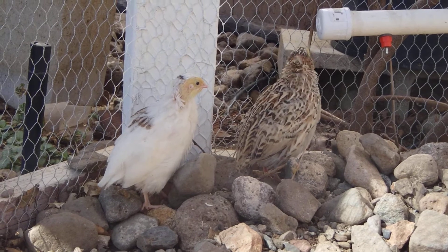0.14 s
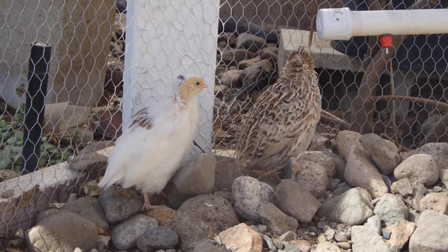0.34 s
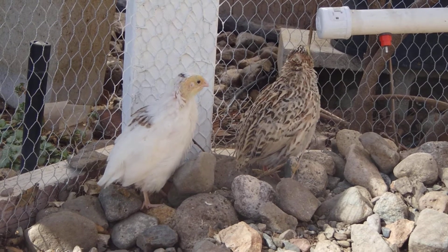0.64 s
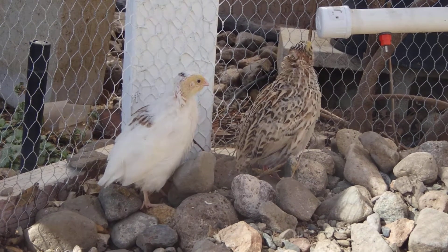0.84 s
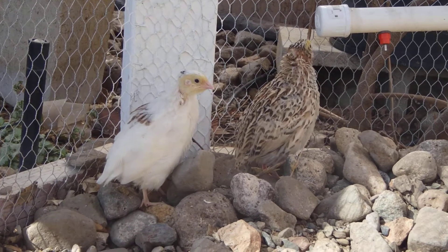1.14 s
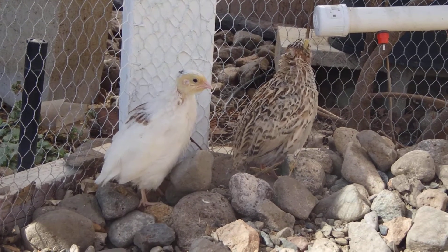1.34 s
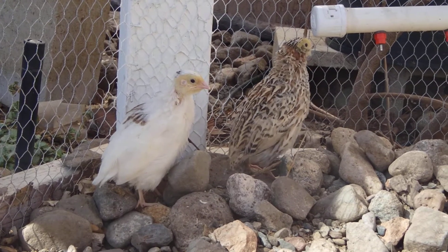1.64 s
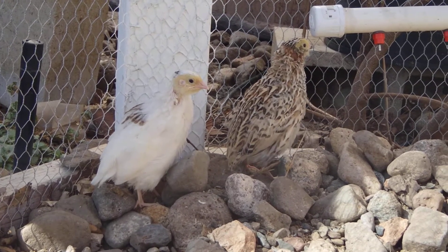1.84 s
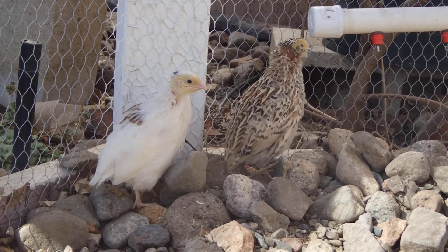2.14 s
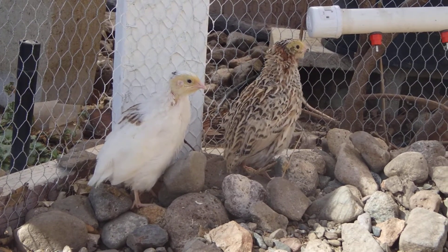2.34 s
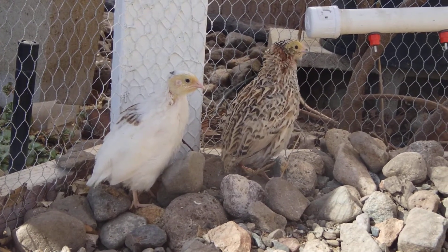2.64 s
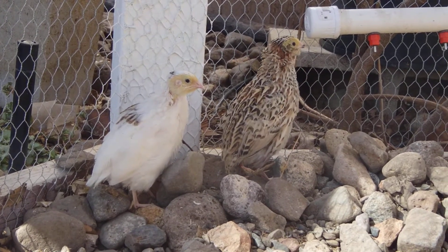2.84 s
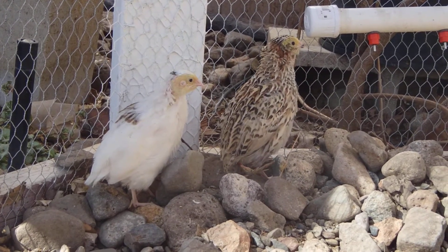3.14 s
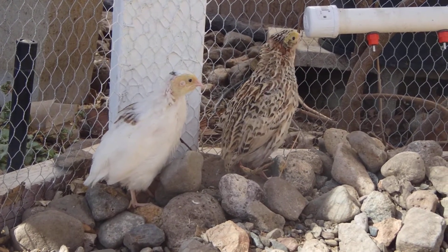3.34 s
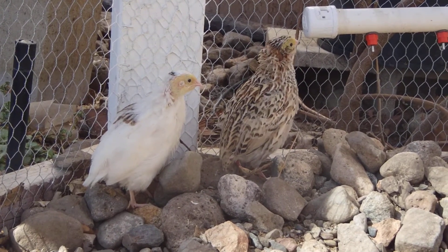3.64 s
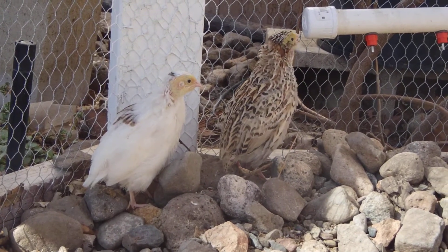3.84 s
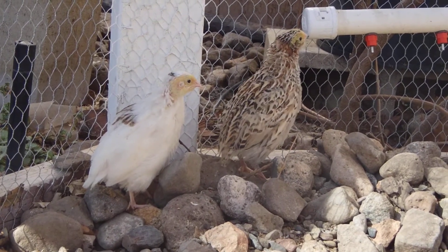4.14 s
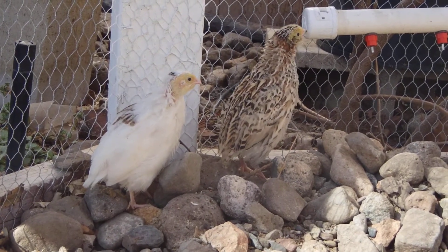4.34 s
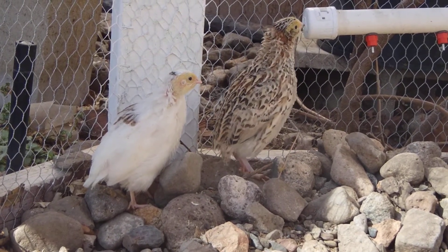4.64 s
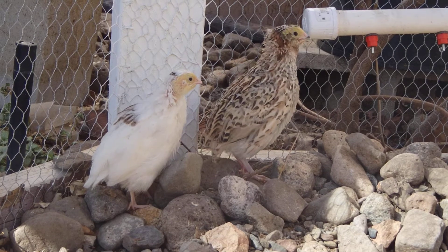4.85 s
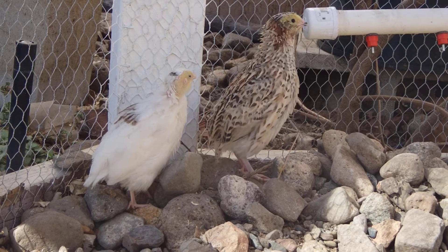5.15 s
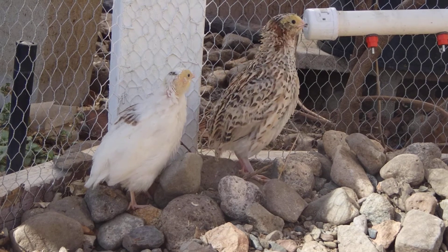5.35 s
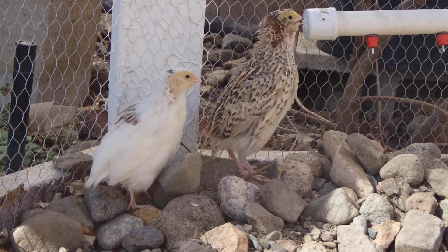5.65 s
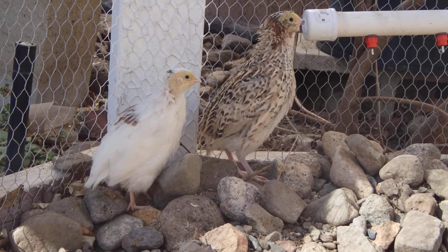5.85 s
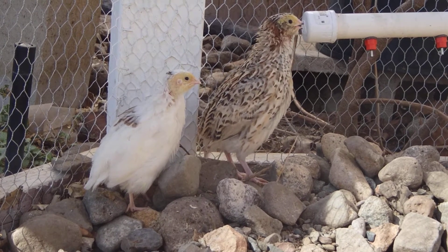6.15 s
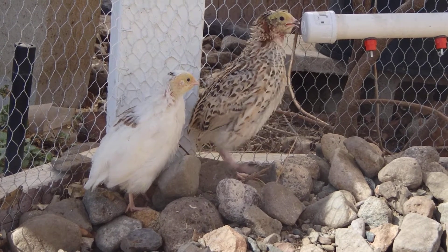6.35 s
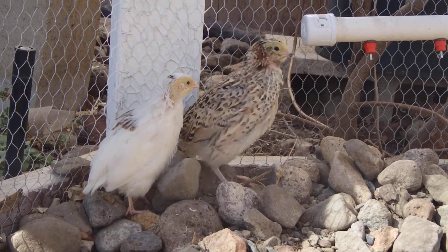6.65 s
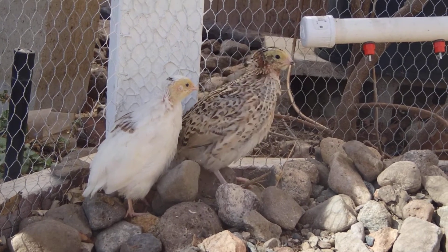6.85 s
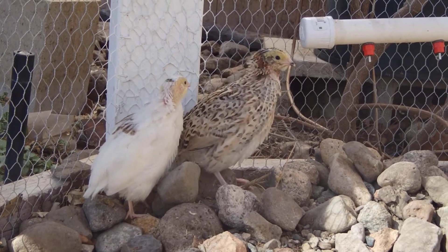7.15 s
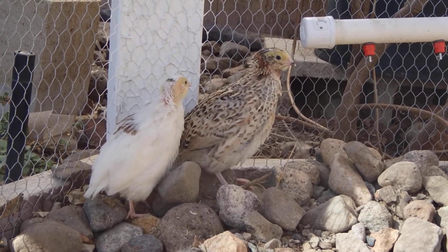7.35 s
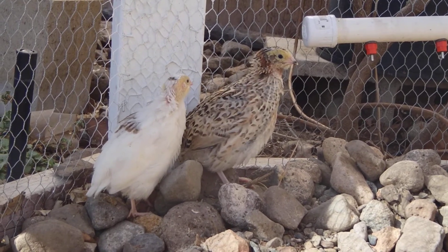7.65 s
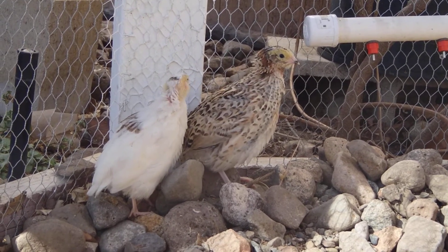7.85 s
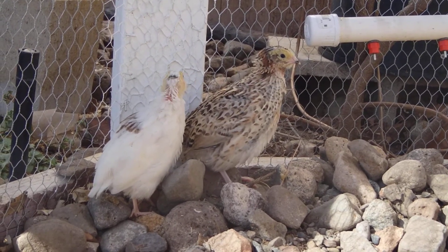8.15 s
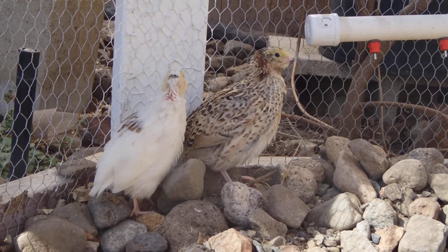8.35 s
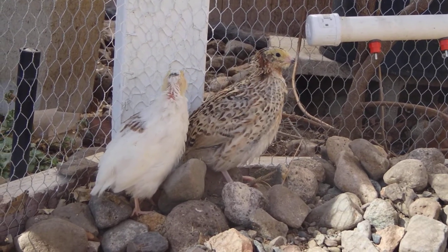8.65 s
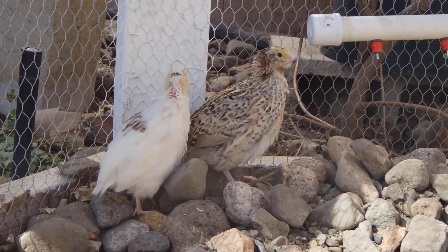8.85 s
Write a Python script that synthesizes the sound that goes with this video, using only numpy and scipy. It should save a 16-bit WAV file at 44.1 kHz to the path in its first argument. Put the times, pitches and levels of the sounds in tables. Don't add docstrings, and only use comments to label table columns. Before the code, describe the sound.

A quail stands close to the microphone in a stony outdoor pen. Grit snaps underfoot early, with one soft low knock on the camera. Soft, broken piping then grows into regular loud whistles, each dropping in, warbling, holding, breaking and sliding down. The strongest crackle with overload. After the last call, only faint far birds, town rumble and hiss remain.

```python
import sys
import numpy as np
from scipy import signal
from scipy.io import wavfile
from scipy.ndimage import uniform_filter1d

SR = 44100
rng = np.random.default_rng(int(sys.argv[2]) if len(sys.argv) > 2 else 0)


def elevation(decibels):
    levels = np.asarray(decibels, float)
    return 10 ** (levels / 20)


def int16_out(signal):
    q = np.round(np.clip(np.atleast_2d(signal).T, -1, 1) * 32767)
    wavfile.write(sys.argv[1], SR, q.astype(np.int16))


N = 396459


def evened(x):
    return x / np.sqrt(np.mean(x ** 2) + 1e-20)


def read(points, hz):
    f, value = np.transpose(points)
    return np.interp(np.log(hz + 1), np.log(f + 1), value)


def add(mix, s, sound):
    part = mix[round(s * SR):][:len(sound)]
    part += sound[:len(part)]


def resonate(x, hz, width):
    turn = np.exp(2j * np.pi * np.cumsum(hz * np.ones(len(x))) / SR)
    r = np.exp(-np.pi * width / SR)
    return 2 * (turn * signal.lfilter([1 - r], [1, -r], x / turn + 1e-18)).real


def resonate_twice(x, hz, width):
    return resonate(resonate(x, hz, width), hz, width)


def smooth_twice(x, first, second):
    return uniform_filter1d(uniform_filter1d(x, size=first), size=second)


def hump(u):
    return np.cos(np.pi * np.clip(u, -.5, .5)) ** 2


def tail(t60, seconds):
    taps = np.zeros((2, round(seconds * SR)))
    start = np.arange(400, taps.shape[1] - 20, 20)
    at = start + rng.integers(0, 20, (2, len(start)))
    sizes = rng.choice([-1., 1.], at.shape) * elevation(-60 * at / SR / t60)
    np.put_along_axis(taps, at, sizes, 1)
    return taps / np.linalg.norm(taps[0])


# time in seconds, pitch lift in Hz, width in seconds, catch in dB.
WARBLE_CRESTS = [(1.561, 120, .017, 0), (2.317, 168, .024, 0), (2.339, 130, .018, 0),
                 (2.857, 327, .022, -10), (3.384, 300, .017, 0), (3.406, 218, .02, -5),
                 (3.943, 251, .019, -12), (3.963, 289, .021, -12), (3.982, 240, .027, -8),
                 (4.494, 245, .021, -7.5), (4.515, 317, .022, -7.5), (4.533, 345, .022, -18),
                 (4.5495, 180, .028, -13), (5.0642, 331, .023, -20), (5.0845, 324, .021, -22),
                 (5.1028, 304, .02, -24), (5.1145, 270, .024, -1.5), (5.686, 250, .018, -8),
                 (5.7042, 255, .021, -13), (5.722, 110, .018, -6), (5.824, 75, .024, 0),
                 (6.364, 240, .018, -7), (6.382, 218, .02, -3)]
# time in seconds, level in dB.
VOICE_CATCHES = [(.929, -17), (.944, -25), (2.308, -11), (2.328, -14), (2.868, -12), (2.998, -28),
                 (3.416, -8.5), (3.5265, -18), (3.9542, -6), (4.0044, -13), (4.0164, -10), (4.072, -30),
                 (4.099, -10), (4.5218, -11), (4.5262, -8), (3.9893, -12), (5.7268, -12), (5.7, -7),
                 (4.566, -9), (4.582, -10), (4.6, -7), (4.505, -9), (.971, -22), (3.553, -10), (4.6595, -8),
                 (5.1268, -8), (5.071, -4), (5.1903, -10), (5.232, -9), (5.811, -12), (6.3743, -8)]
# time in seconds, change of effort
# in dB, crack in dB, gain drop in dB.
EFFORT_SURGES = [(4.5243, 6.5, -25, 1), (4.541, 2.5, -24, 2), (4.5465, 4, -22, 5), (5.0798, 2, -25, 1),
                 (5.0938, 2, -28, 1), (5.0985, 2.5, -24, 2), (5.1225, 3.5, -25, 4.5), (5.7015, 3, -27, 1),
                 (5.714, -3, -31, 1), (5.7285, 0, -26, 2), (5.7545, 1.5, -26, 3), (5.76, 0, -30, 3),
                 (6.381, -1.5, -38, 0), (6.385, 3, -25, 1.5)]
# partial number, level under the second in dB, throat cut in Hz,
# extra growth in dB per dB of effort.
UPPER_PARTIALS = [(3, -33, 4310, .2), (4, -33.5, 5080, 1.1), (5, -57, 6700, .8), (6, -59, 7900, .8)]


def whistle(corners):
    s, pitch, second_db, first_db = np.transpose(corners)
    t = np.arange(s[0], s[-1], 1 / SR)
    loudest_db = second_db.max()
    curves = (pitch, elevation(second_db), elevation(first_db))
    hz, second, first = (uniform_filter1d(np.interp(t, s, c), size=90) for c in curves)

    plunge = np.interp(t, s[1] + np.array([.003, .0095]), [pitch[1], pitch.min()])
    hz = np.maximum(hz, plunge * (t > s[1]))
    second = second * np.clip((t - s[1] - .006) / .0045, 0, 1)

    warble = sum(lift * hump((t - at) / width) for at, lift, width, _ in WARBLE_CRESTS)
    catches = VOICE_CATCHES + [(at + .0003, db) for at, _, _, db in WARBLE_CRESTS]
    throb_db = sum(db * hump((t - at) / (.002 + .0004 * abs(db))) for at, db in catches)
    throb_db += sum(db * hump((t - at) / .0068) for at, db, _, _ in EFFORT_SURGES)
    tremor, flutter, beads = smooth_twice(rng.standard_normal((3, len(t))), 150, 120)
    throb_db -= .9 * min(loudest_db + 28, 0) * np.minimum(evened(beads), .3)

    hz = (hz + warble) * (1 + .035 * tremor)
    phase = 2 * np.pi * np.cumsum(hz) / SR
    throat_top_hz = 3270
    second = second * elevation(throb_db) / (1 + (2 * hz / throat_top_hz) ** 60)
    first = first * elevation(1.77 * evened(flutter) + 3.2 * (warble / 300) ** 2)
    voice = first * np.sin(phase) + second * np.sin(2 * phase)

    ahead = uniform_filter1d(warble[::-1], size=1300, origin=649)[::-1]
    steadiness = 1 / (1 + (ahead / 35) ** 4)
    for k, db, top_hz, growth in UPPER_PARTIALS:
        level = second * steadiness * elevation(db + growth * (loudest_db + 7.5))
        voice += level / (1 + (k * hz / top_hz) ** 24) * np.sin(k * phase)

    breath = resonate_twice(rng.standard_normal(len(t)), 2950, 500)
    windpipe = resonate_twice(rng.standard_normal(len(t)), 1700, 110)
    voice += elevation(-14) * first * evened(windpipe) * (1 - steadiness)
    return s[0], np.sqrt(2) * voice + elevation(-29.5) * second * evened(breath)


def contour(entry, hold, slide):
    s, entry_hz, entry_db, land_hz, ring_db = entry
    full, hz, db, fade_db = hold
    gap, end, from_hz, to_hz, slide_db = slide
    silent_db, break_db, thin_db = -64, -24, -7
    sagged = (hz + from_hz) / 2
    faded = max(gap - .013, full + .004)
    low_db, slide_low_db = (max(-22.5 + .74 * d, -46) for d in (db, slide_db))
    fill_db = max(-1.5 + .6 * min(db + 5, 0), -13)
    return [(s - .0065, entry_hz - 60, silent_db, silent_db),
            (s, entry_hz, silent_db, entry_db),
            (s + .0105, land_hz, ring_db, low_db - 5.5),
            (s + .038, hz + .2 * (land_hz - hz), db + fill_db, low_db - 1.5),
            (full, hz, db, low_db),
            ((full + faded) / 2, (hz + sagged) / 2, db + .7 * fade_db, low_db + 1.1),
            (faded, sagged, db + fade_db, low_db + .6),
            (gap, sagged + 20, slide_db + break_db, slide_low_db + .45 * break_db),
            (gap + .015, from_hz, slide_db, slide_low_db),
            (end, to_hz, slide_db - 2.5, slide_low_db + thin_db),
            (end + .008, to_hz - 15, slide_db - 27, slide_low_db + 1.4 * thin_db),
            (end + .03, to_hz - 30, silent_db, silent_db)]


# start in seconds, entry pitch in Hz, entry level in dB,
# landing pitch in Hz, level in dB as the throat first rings.
CALL_ENTRIES = [
    (.909, 1810, -43, 1450, -32.5),
    (1.52, 1775, -38.5, 1515, -31.5),
    (2.278, 1785, -34, 1490, -31.5),
    (2.836, 1940, -38, 1430, -32),
    (3.366, 2005, -32, 1355, -36),
    (3.924, 2025, -30, 1310, -24.5),
    (4.474, 2065, -30, 1265, -16.5),
    (5.043, 2195, -33.5, 1305, -9.5),
    (5.663, 2015, -29, 1285, -11),
    (6.341, 1950, -28.5, 1290, -13),
]
# fullest moment in seconds, pitch in Hz, effort in dB,
# fade before the break in dB.
CALL_HOLDS = [(.988, 1380, -37, -8), (1.58, 1235, -53, 0), (2.33, 1255, -38.5, -18), (2.915, 1195, -29, -7),
              (3.468, 1240, -14.5, -9), (3.99, 1300, -10, -11), (4.545, 1290, -6.5, -6.5),
              (5.165, 1300, -4.3, -9), (5.76, 1280, -2.5, -11), (6.39, 1290, -6, -9)]
# break in seconds, end in seconds, start pitch in Hz,
# end pitch in Hz, effort in dB.
CALL_SLIDES = [(1.01, 1.04, 1370, 1320, -47), (1.63, 1.655, 1340, 1345, -42),
               (2.395, 2.415, 1225, 1215, -43), (2.968, 3.015, 1175, 1150, -34),
               (3.508, 3.555, 1225, 1150, -19.5), (4.058, 4.12, 1270, 1175, -13),
               (4.633, 4.683, 1235, 1165, -10.5), (5.205, 5.257, 1235, 1155, -8.5),
               (5.82, 5.872, 1240, 1150, -6.5), (6.495, 6.549, 1215, 1110, -11)]


def quail_calls(quail):
    for call in zip(CALL_ENTRIES, CALL_HOLDS, CALL_SLIDES):
        add(quail, *whistle(contour(*call)))


# centre in Hz, width in Hz, level in dB.
HOARSE_THROAT = [(1120, 450, -15), (1760, 320, -8), (2280, 170, -7), (2860, 410, -3.5), (4430, 600, -22)]


def rasp(s, length, rate, db, rough):
    t = np.arange(round(length * SR)) / SR
    turns = np.cumsum(rate * (1 - .023 * t / length)) / SR
    pulses = sum(np.cos(2 * np.pi * k * turns) for k in range(1, 16))
    puffs = np.exp(-(turns % 1) / .3) * rng.standard_normal(len(t))
    drive = (1 - rough) * evened(pulses) + rough * evened(puffs)
    throat = sum(elevation(d) * resonate_twice(drive, f, w) for f, w, d in HOARSE_THROAT)
    fade = signal.windows.tukey(len(t), .5) * np.exp(-.8 * t / length)
    return s, elevation(db) * evened(throat) * fade


# start in seconds, length in seconds, pulses per second,
# level in dB, roughness from 0 to 1.
HOARSE_NOTES = [
    (.99, .12, 330, -41.5, .9),
    (1.63, .065, 234, -41.5, .3),
    (2.4, .055, 290, -40, .4),
    (2.995, .03, 300, -49, .8),
    (6.137, .048, 394, -39.5, .6),
]


def quail_rasps(quail):
    for row in HOARSE_NOTES:
        add(quail, *rasp(*row))


# delay in seconds, left level in dB, right level in dB.
PEN_ECHOES = [(.0031, -16.5, -15.5), (.0068, -15, -13), (0.0135, -18.5, -15.5), (.022, -26, -26),
              (.072, -33.5, -31.5), (.118, -38.5, -36)]


def pen(x):
    low = resonate_twice(x, 1500, 1200)
    left = elevation(-.2) * x + .058 * low
    right = elevation(.53) * np.roll(x - .099 * low, 1)
    out = np.array([left, right])
    for delay, left_db, right_db in PEN_ECHOES:
        out += np.roll(x, round(delay * SR)) * elevation(np.array([[left_db], [right_db]]))
    near = signal.fftconvolve(x[None], tail(.033, .27), axes=1)[:, :N]
    yard = signal.fftconvolve(x[None], tail(.52, .41), axes=1)[:, :N]
    return out + elevation(-22) * (near[0] + .5 * near) + elevation(-28.5) * (yard[0] + .6 * yard)


# time in seconds, peak in dB.
GRIT_SNAPS = [(.6114, -37.5), (.6215, -30), (.634, -28), (.6432, -19.5), (.6505, -25), (.6538, -18),
              (.6573, -17), (.6602, -15.5), (.6737, -15.5), (.836, -33), (.8474, -38)]
# time in seconds, peak in dB, pitch in Hz.
CAMERA_KNOCK = (.744, -25.5, 88)


def gravel():
    grit = np.zeros(N)
    t = np.arange(200) / SR
    for s, db in GRIT_SNAPS:
        snap = rng.standard_normal(len(t)) * np.exp(-t / .001)
        snap = signal.lfilter(*signal.butter(5, 8000 / (SR / 2)), resonate(snap, 4500, 3500))
        add(grit, s, elevation(db) * snap / abs(snap).max())
    s, db, hz = CAMERA_KNOCK
    t = np.arange(1500) / SR
    turns = hz * t + .67 * (1 - np.exp(-t / .0033))
    knock = np.zeros(N)
    add(knock, s, -elevation(db) * np.sin(2 * np.pi * turns) * np.exp(-t / .011))
    return grit * elevation(np.array([[-3], [.6]])) + knock


# start in seconds, length in seconds, start pitch in Hz,
# end pitch in Hz, level in dB.
CLEAR_WHISTLES = [
    (.345, .15, 1440, 1345, -52),
    (.589, .166, 2225, 2055, -56),
    (6.188, .11, 4560, 4490, -63.5),
    (6.8, .05, 2060, 2100, -56),
    (7.121, .092, 1450, 1400, -59),
    (7.6, .11, 1920, 2350, -55),
    (7.808, .057, 2050, 2000, -58),
    (8.52, .04, 1980, 2250, -56),
]
# start in seconds, length in seconds, start pitch in Hz,
# end pitch in Hz, level in dB.
SCRATCHY_CHIRPS = [(.554, .06, 3180, 3000, -49.5), (1.107, .048, 4050, 4060, -57),
                   (1.822, .052, 2650, 3450, -42), (1.831, .03, 3800, 3950, -52),
                   (2.013, .04, 2960, 2300, -50.5), (2.195, .017, 3280, 3060, -49),
                   (3.355, .035, 4280, 4570, -53), (4.259, .065, 2450, 3550, -41),
                   (8.935, .025, 2050, 2000, -56), (7.925, .055, 2250, 3000, -47),
                   (4.33, .071, 3300, 3100, -52.5), (4.98, .03, 3060, 3100, -48),
                   (5.52, .079, 3000, 2880, -47.5), (6.93, .08, 3000, 3150, -40.5),
                   (7.02, .05, 3000, 3000, -45), (7.197, .035, 3180, 3000, -47.5),
                   (7.602, .14, 2950, 3000, -54), (7.626, .09, 4100, 4560, -60.5),
                   (7.901, .04, 3740, 4300, -55.5), (8.8, .13, 3000, 3250, -53)]


def far_birds():
    direct = np.zeros(N)
    for rows, blur_hz in ((CLEAR_WHISTLES, 40), (SCRATCHY_CHIRPS, 420)):
        for s, length, start_hz, end_hz, db in rows:
            glide = np.linspace(start_hz, end_hz, round(length * SR))
            fuzz = resonate_twice(rng.standard_normal(len(glide)), glide, blur_hz)
            add(direct, s, elevation(db) * evened(fuzz) * signal.windows.tukey(len(glide), .5))
    swell = evened(smooth_twice(rng.standard_normal(N), 4000, 2000))
    middle, side = [resonate_twice(n, 2930, 520) for n in rng.standard_normal((2, N))]
    chorus = elevation(-58 + 1.8 * swell) * evened(middle + .45 * np.array([side, -side]))
    echoes = signal.fftconvolve(direct[None], tail(.45, .41), axes=1)[:, :N]
    return direct + elevation(-1.5) * echoes + chorus


# frequency in Hz, density in dB per Hz.
AIR_SPECTRUM = [(12, -42.5), (20, -12), (44, -7), (92, 2), (298, -17.5), (342, -16), (440, -20.5),
                (811, -20.5), (1070, -24), (3170, -26), (3650, -30), (13500, -31.5), (15500, -29.5)]
# frequency in Hz, likeness from 0 to 1.
CHANNEL_LIKENESS = [(40, .9), (150, .93), (300, .78), (950, .78), (2400, .6), (6000, 0), (15000, 0)]
# frequency in Hz, left minus right in dB.
CHANNEL_TILT = [(60, -1), (380, 0.5), (2380, -0.5), (15000, 0.5)]
# time in seconds, level in dB.
RUMBLE_SWELLS = [(0.0, -40), (0.02, -42), (4.73, -45), (7.06, -43), (7.36, -38), (7.49, -44), (7.61, -33),
                 (7.63, -42), (8.96, -43), (8.99, -41)]


def air():
    frames, hz = N // 256 + 5, np.fft.rfftfreq(1024, 1 / SR)
    a, b, c, d, patches = rng.standard_normal((frames, 513, 5)).T
    patches = evened(uniform_filter1d(uniform_filter1d(patches, size=8, axis=0), size=14, axis=1))
    s, db = np.transpose(RUMBLE_SWELLS)
    swell_db = np.interp(np.arange(frames) * 256 / SR, s, db)
    swell_db = swell_db - np.median(swell_db)
    low = 1 / (1 + (hz[:, None] / 260) ** 2)
    same = np.clip(read(CHANNEL_LIKENESS, hz), -1, 1)[:, None]
    left = a + 1j * b
    right = same * left + np.sqrt(1 - same ** 2) * (c + 1j * d)
    z = np.array([left, right])
    z *= elevation(read(AIR_SPECTRUM, hz)[:, None] + .6 * patches + low * swell_db)
    z *= (hz < 15700)[:, None]
    z *= elevation(np.array([.5, -.5])[:, None, None] * read(CHANNEL_TILT, hz)[:, None])
    return elevation(-41) * evened(signal.istft(z, nperseg=1024, noverlap=768)[1][:, :N])


def scene():
    quail = np.zeros(N)
    left, right = air()
    quail_calls(quail)
    quail_rasps(quail)
    background = np.array([left, np.roll(right, 2)])
    return pen(quail) + gravel() + far_birds() + background


def band_limit(x):
    return signal.sosfilt(signal.butter(12, 15670, fs=SR, output="sos"), x)


def record(dry):
    t, drop_db, cracks = np.arange(N) / SR, np.zeros(N), np.zeros(N)
    flat_tops, half_cycle = 6, 8
    edge = np.exp(-np.arange(12) / 2.2)
    for s, _, crack_db, step_db in EFFORT_SURGES:
        drop_db = np.maximum(drop_db, (t > s) * (step_db - 9. * (t - s)))
        signs = (-1.) ** np.arange(flat_tops)
        tops = np.zeros(flat_tops * half_cycle)
        tops[::half_cycle] = signs * np.hanning(flat_tops) * rng.exponential(size=flat_tops)
        tops = tops / np.linalg.norm(tops)
        add(cracks, s - .0005, elevation(crack_db + 9) * np.convolve(tops, edge))
    cracks = signal.lfilter(*signal.butter(2, 3200 / (SR / 2), "high"), cracks)
    held = np.clip(dry / elevation(uniform_filter1d(drop_db, size=100)), -1, 1)
    mix = held + cracks * elevation(np.array([[-2], [4]]))
    return band_limit(mix)


dry = scene()
out = record(dry)
int16_out(out)
```